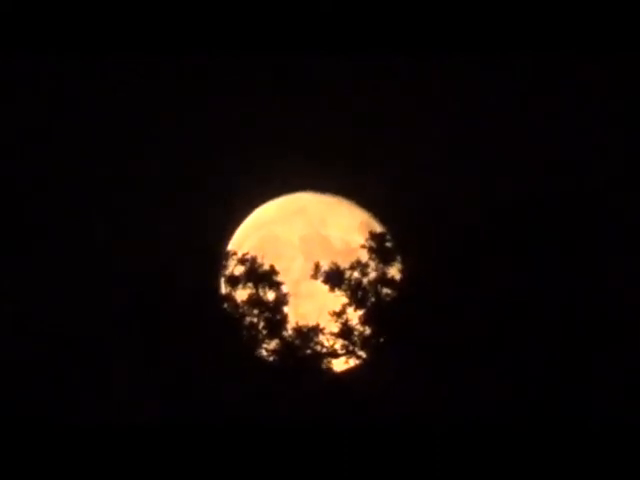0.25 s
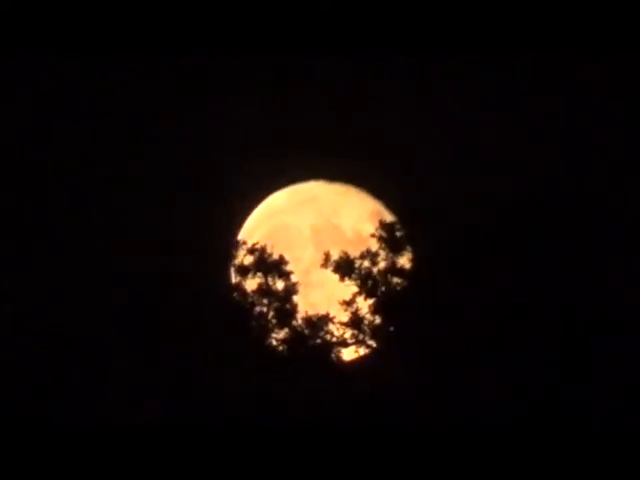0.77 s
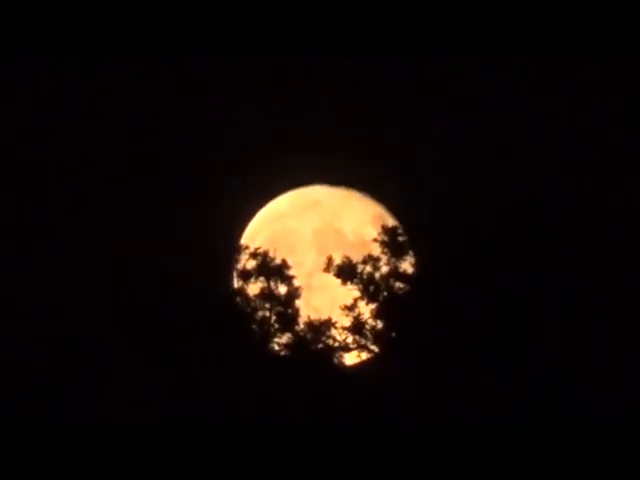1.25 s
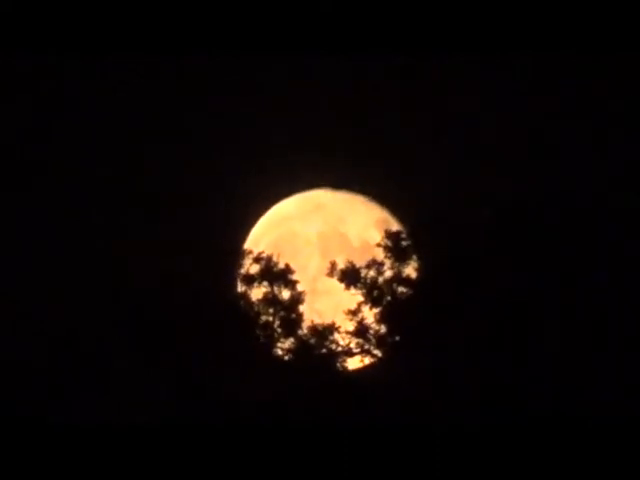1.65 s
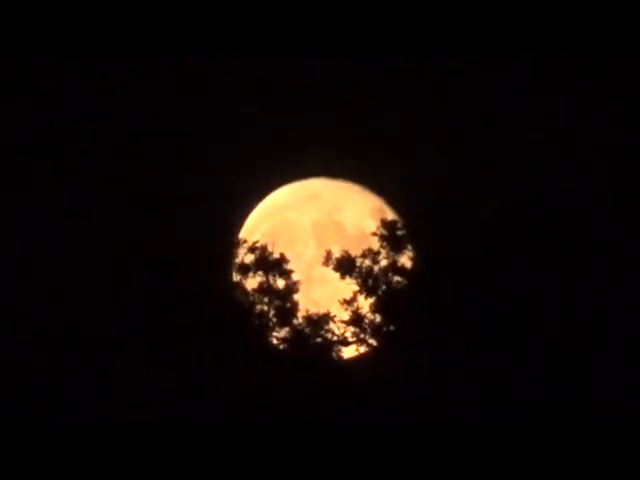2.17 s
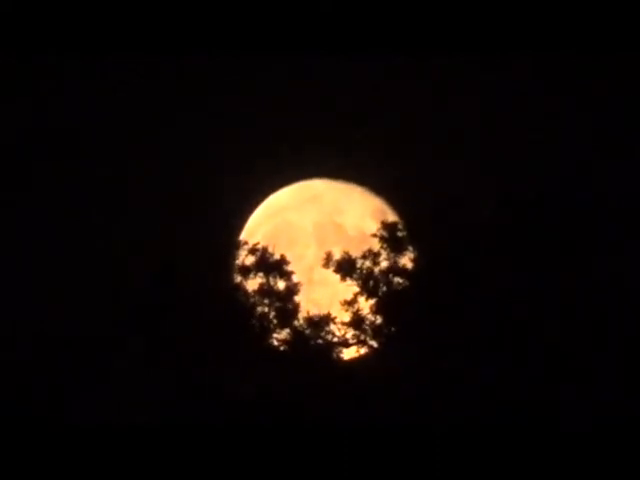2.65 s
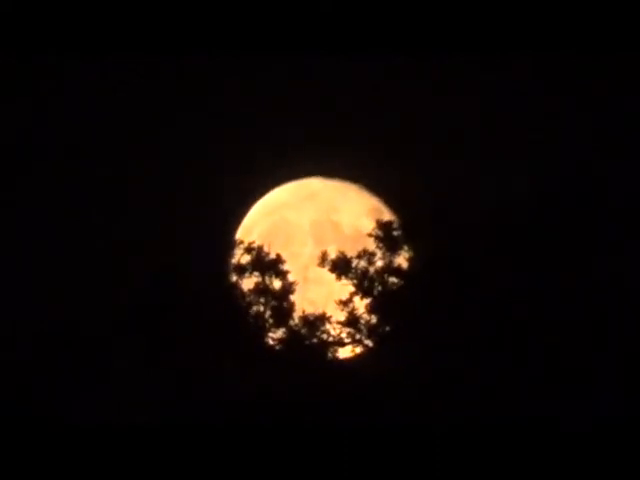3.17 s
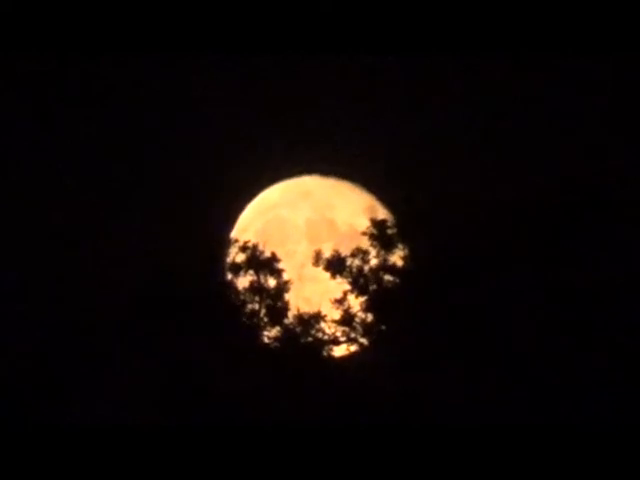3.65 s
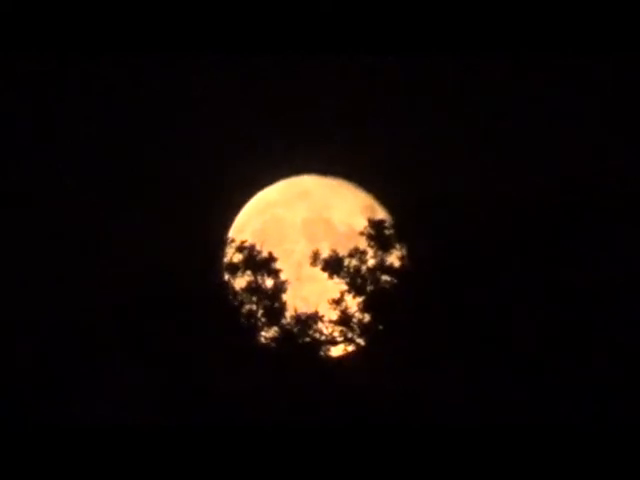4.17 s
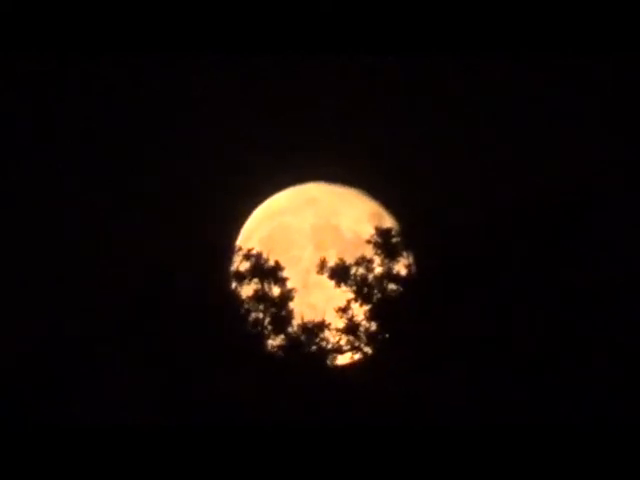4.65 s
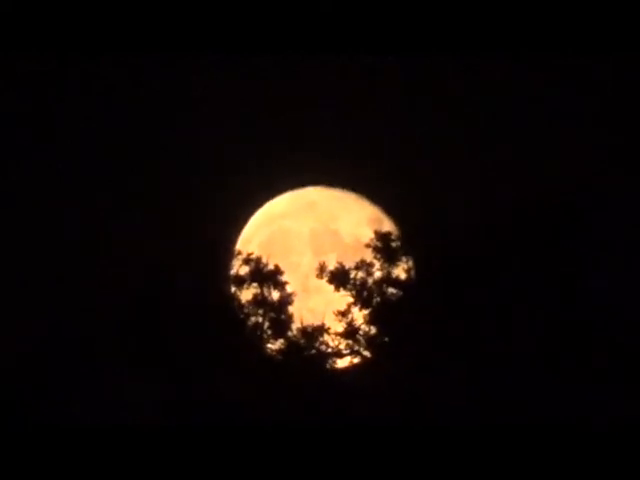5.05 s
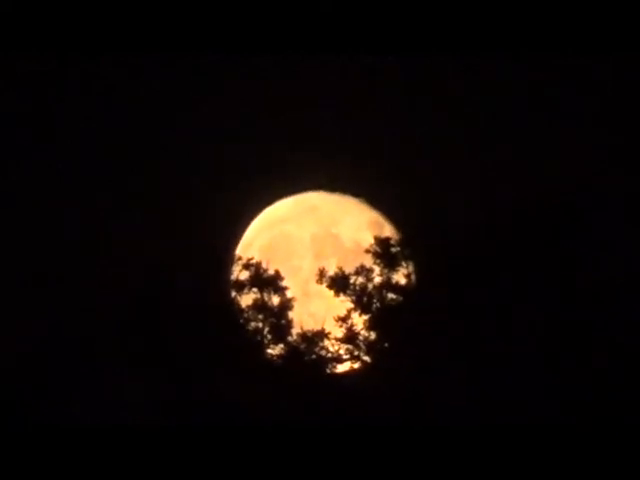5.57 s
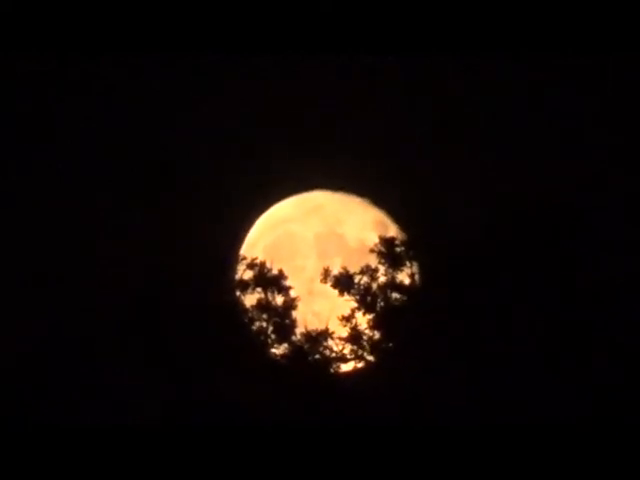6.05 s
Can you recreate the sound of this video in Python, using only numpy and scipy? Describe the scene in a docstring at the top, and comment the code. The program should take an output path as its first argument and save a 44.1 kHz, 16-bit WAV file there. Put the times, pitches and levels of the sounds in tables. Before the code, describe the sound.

Continuous high, purring cricket song fills the night, several singers blurred by echoes from foliage. One closer cricket repeatedly bursts in, fades slightly while rising in pitch, then stops, leaving the distant groups. Above is a thin, glittering insect hiss in rapid pulses; below, barely audible wide air. Two extremely dim distant hoots appear near the beginning and later on, and a crisp little tick sounds near the listener around halfway.

```python
"""Trees at night: tree crickets trill, one near singer in phrases and farther groups behind it.
Each cricket is a row of short tones, one per wing stroke, blurred by scattered echoes from foliage.
A katydid pulses as high hissing noise above them, and soft shaped noise makes the night air murmur.
Two dim, far hoots are short wavering tones. One small tick with a faint rebound, near the listener,
is a burst of noise plus a brief ring."""
import sys
import numpy as np
from scipy import signal
from scipy.fft import rfft, irfft, next_fast_len
from scipy.io import wavfile
from scipy.ndimage import uniform_filter1d

SR = 44100
rng = np.random.default_rng(int(sys.argv[2]) if len(sys.argv) > 2 else 0)


def transcribe(u):
    """Save the signal u as a 16-bit wav file named by the first command-line argument.

    u: samples, shape (n,) or (channels, n), limited to [-1, 1]; the rate is SR.
    q: integer samples, one column per channel.
    """
    v = np.clip(np.atleast_2d(u).T, -1, 1)
    q = np.round(v * 32767).astype(np.int16)
    wavfile.write(sys.argv[1], SR, q)


N = 278271  # length in samples

# singers of each farther group; levels are relative, a positive pan is louder on the left:
# pitch_hz, strokes_per_s, level_db, pan_db
LOW_CRICKETS = [(3312, 51.8, -5.5, 0), (3344, 52.4, -3, 1), (3163, 50.3, -8, -2)]
MIDDLE_CRICKETS = [(3458, 56, -0.82, .5), (3523, 57.8, -0.92, 1.2)]
HIGH_CRICKETS = [(3602, 59.5, 1.5, 1.3), (3624, 61.5, -6, 6.2), (3705, 88, -8.5, 8.2)]
# overlapping swells of the low group: crest_s, rise_db
LOW_SWELLS = [(.42, 5), (.88, 4.5), (1.45, 4.5), (1.8, 5), (2.27, 2.5), (2.73, 4.5), (3.13, 3), (4.03, 8.5),
              (5.1, 5.5), (6.22, 6)]
SWELL_WIDTH_S = 0.18
# moments when the high group falls back: middle_s, width_s, depth_db
HIGH_LULLS = [(0.702, 0.06, 5), (2.082, 0.16, 3.5), (2.499, 0.096, 3), (3.58, 0.19, 7),
              (4.524, 0.063, 13.5), (5.55, 0.22, 2)]
# levels of the groups before swells and lulls
LOW_DB, MIDDLE_DB, HIGH_DB = -45.5, -40.5, -39
# the katydid's two wing strokes: place_in_cycle (0 to 1), width_cycles, level_db (relative)
WING_STROKES = [(.04, 0.18, 0.5), (.68, 0.073, -6)]
KATYDID_CYCLES_PER_S = 15.755
# spectrum of the katydid's hiss: frequency_hz, level_db (relative)
KATYDID_SPECTRUM = [(5000, -58), (7600, -12.5), (8600, -7), (9500, -0.5), (10200, 1.5), (10700, 1.5),
                    (11200, -16), (13000, -30)]
# spectrum of the night air: frequency_hz, level_db (relative)
AIR_SPECTRUM = [(20, -28), (60, -19.5), (110, -7.5), (250, -3), (600, 1.5), (1000, 0.5), (1600, -2.5),
                (2600, -2.5), (4400, -3.5), (6000, -5.5), (11000, -16.5)]
# how alike the air is at left and right: frequency_hz, likeness (1 = the same)
AIR_LIKENESS = [(100, 0.93), (300, 0.65), (700, 0.26), (1400, 0.11), (2300, 0.13), (4500, 0.69),
                (10000, 0.11)]
# far hoots: middle_s, pitch_hz, level_db, width_s
FAR_HOOTS = [(.135, 715, -60.5, .022), (5.285, 786, -60.5, .034)]
# the nearest cricket's phrases, with levels before the fade: start_s, stop_s, level_db
NEAR_PHRASES = [(0.392, 0.516, -37.5), (.645, 0.984, -35), (1.218, 1.503, -42), (1.551, 2.035, -37),
                (2.123, 2.34, -38.5), (2.604, 3.326, -36), (3.734, 4.183, -33.5), (4.811, 5.359, -36),
                (5.724, 5.915, -37.5), (5.926, 6.407, -36.5)]
ATTACK_S, RELEASE_S = 0.0035, 0.036
# a phrase starts at this pitch and octave level, then grows higher, brighter and softer
NEAR_HZ, NEAR_OCTAVE_DB = 3480, -28
RISE_HZ_PER_S, BRIGHTEN_DB_PER_S, FADE_DB_PER_S = 80, 12, 8
# the tick and its rebound: start_s, level_db, ring_db (added to level_db for the ring)
CONTACTS = [(3.2196, -25, 1), (3.2862, -33, -18)]
# tones that ring after a tick: pitch_hz, level_db (relative), t60_s (time to fall 60 dB)
RING_MODES = [(686, -15.5, 0.036), (970, -14, 0.028), (1330, -9.5, 0.012), (1550, -12, 0.011),
              (2164, -25, 0.053), (2510, -20.5, 0.042), (4220, -19.5, 0.029), (5720, -7.5, 0.0098),
              (7440, -16, .01), (9260, -7, 0.0086)]
TOP_HZ = 11150  # nothing is heard from here up


def amp(db):
    """Turn decibels into a gain."""
    return 10 ** (np.asarray(db) / 20)


def unit(x):
    """Scale a sound to an average (rms) level of 1."""
    return x / np.sqrt(np.mean(x ** 2) + 1e-20)


def along(points, hz):
    """Read a curve of (frequency, value) points on a log frequency axis."""
    f, value = np.transpose(points)
    return np.interp(np.log(hz + 1), np.log(f + 1), value)


def wobble(rate):
    """Make a smooth random curve with about `rate` random points a second."""
    knots = rng.standard_normal(int(N * rate / SR) + 4)
    fine = signal.resample_poly(knots, 10, 1)
    return np.interp(np.arange(N) * 10 * rate / SR, np.arange(len(fine)), fine)


def bump(at, width):
    """A smooth rise and fall of height 1 around a moment, both in seconds."""
    return np.exp(-.5 * ((np.arange(N) / SR - at) / width) ** 2)


def filtered(x, response):
    """Multiply the spectrum of a sound by a response to frequency."""
    m = next_fast_len(N + SR // 2)
    spectrum = rfft(x, m) * response(np.fft.rfftfreq(m, 1 / SR))
    return irfft(spectrum, m)[..., :N]


def panned(pan_db):
    """Left and right gains that differ by pan_db."""
    return amp([[pan_db / 2], [-pan_db / 2]])


def rush(colour, alike, patchy_db):
    """Stereo noise with a given spectrum and left-right likeness, in brief patches of random gain."""
    grid = signal.stft(rng.standard_normal((2, N)), nperseg=1024)[2]
    patches = rng.standard_normal(grid.shape[1:])
    patches = uniform_filter1d(patches, size=3, axis=0)  # smooth over frequency
    patches = uniform_filter1d(patches, size=4, axis=1)  # smooth over time
    pair = signal.istft(grid * amp(patchy_db * unit(patches)))[1][:, :N]

    def response(hz):
        # more shared (mid) sound makes the ears more alike
        angle = np.arccos(np.clip(along(alike, hz), -1, 1)) / 2
        return amp(along(colour, hz)) * [np.cos(angle), np.sin(angle)]

    mid, side = filtered(pair, response)
    return unit(np.array([mid + side, mid - side]))


def foliage(x, wet_db, t60, side_db):
    """Direct sound plus a dense scatter from leaves and trunks, a little different at each ear."""
    t = np.arange(SR // 3) / SR
    mid, side = rng.standard_normal((2, len(t))) * amp(-60 * t / t60)
    paths = np.array([mid + amp(side_db) * side, mid - amp(side_db) * side])
    paths *= amp(wet_db) / np.linalg.norm(paths[0])
    paths[:, 0] += 1  # the direct sound
    # mirrored sound ahead of the start lets the scatter be there already
    lead_in = np.pad(x, (len(t) - 1, 0), mode="reflect")
    return signal.fftconvolve(lead_in[None], paths, "valid", axes=1)


def trill(pitch_hz, strokes, glide, duty, overtone_db, rasp_db):
    """One cricket: each closing of the wings sounds a short tone that sags as the scraper slows."""
    stroke_rate = strokes * (1 + .012 * wobble(4) + .024 * wobble(35))
    cycle = rng.random() + np.cumsum(stroke_rate) / SR
    # 0 to 1 during the closing, then held at 1 (silent) until the next; duty is the sounding share
    stroke = np.minimum(cycle % 1 / np.clip(duty, .2, 1), 1)
    pitch = pitch_hz * (1 + glide * (.5 - stroke) + .008 * wobble(70))
    phase = 2 * np.pi * np.cumsum(pitch) / SR
    # uneven teeth on the file add a faint rasp around the tone and roughen its octave
    tone = np.sin(phase) * (1 + amp(rasp_db) * wobble(3200))
    octave = amp(overtone_db) * np.sin(2 * phase + 1.24 * wobble(600))
    loudness = np.sin(np.pi * stroke) ** 2 * amp(1.47 * wobble(40))
    return unit((tone + octave) * loudness)


def group(singers, level_db, glide, duty, overtone_db, rasp_db, wet_db):
    """Several crickets scattered in the trees; louder song is also brighter and raspier."""
    bright_db = 0.25 * (level_db - level_db.mean())
    voices = 0
    for pitch_hz, strokes, db, pan_db in singers:
        song = trill(pitch_hz, strokes, glide, duty, overtone_db + bright_db, rasp_db + bright_db)
        heard = unit(foliage(song, wet_db, t60=0.24, side_db=-8))
        voices = voices + amp(db) * panned(pan_db) * heard
    return amp(level_db) * unit(voices)


def crickets():
    """Low singers swell and high ones fall back in lulls; the middle group follows both neighbours."""
    swell_db = sum(db * bump(s, SWELL_WIDTH_S) for s, db in LOW_SWELLS)
    lull_db = sum(db * bump(s, width) for s, width, db in HIGH_LULLS)
    low_db = LOW_DB + swell_db - 0.051 * lull_db
    middle_db = MIDDLE_DB + 0.41 * swell_db - 0.36 * lull_db
    high_db = HIGH_DB - lull_db
    low = group(LOW_CRICKETS, low_db, glide=.1, duty=.6,
                overtone_db=-28.5, rasp_db=-29.0, wet_db=0.0)
    middle = group(MIDDLE_CRICKETS, middle_db, glide=.05, duty=.68,
                   overtone_db=-24.5, rasp_db=-31.5, wet_db=-1.5)
    high = group(HIGH_CRICKETS, high_db, glide=.06, duty=.64,
                 overtone_db=-26.5, rasp_db=-28.0, wet_db=-0.5)
    return low + middle + high


def katydid():
    """A long and a short wing stroke per cycle, over the glittering hiss of farther neighbours."""
    cycle = KATYDID_CYCLES_PER_S * np.arange(N) / SR
    beats = 0
    for at, width, db in WING_STROKES:
        distance = (cycle - at + .5) % 1 - .5  # from the stroke's middle, in cycles
        beats = beats + amp(db) * np.exp(-.5 * (distance / width) ** 2)
    pulses = unit(beats * amp(1.9 * wobble(24)))
    near = pulses * rush(KATYDID_SPECTRUM, [(10000, 0.91)], patchy_db=0.0)
    far = rush(KATYDID_SPECTRUM, [(10000, 0.85)], patchy_db=3.5)
    return (amp(-57.5) * near + amp(-53.0) * far) * panned(-0.81)


def air():
    """The wide murmur of the night: shaped noise whose level drifts only slightly."""
    return amp(-56.5 + 0.21 * wobble(3.3)) * rush(AIR_SPECTRUM, AIR_LIKENESS, patchy_db=0.93)


def hoots():
    """Short, soft far-off tones, blurred by distance through a wavering phase."""
    t = np.arange(N) / SR
    total = 0
    for s, hz, db, width in FAR_HOOTS:
        tone = np.sin(2 * np.pi * hz * t + 0.89 * wobble(90))
        total = total + amp(db) * bump(s, width) * tone
    return total


def near_cricket():
    """Phrases start sharply, creep up in pitch and brightness as they fade, and let go softly."""
    t = np.arange(N) / SR
    start = np.array([row[0] for row in NEAR_PHRASES])
    latest = np.maximum(np.searchsorted(start, t) - 1, 0)
    age = np.abs(t - start[latest])  # seconds since the phrase began
    gate = 0
    for on, off, db in NEAR_PHRASES:
        attack = np.clip((t - on) / ATTACK_S, 0, 1)
        release = np.clip((off - t) / RELEASE_S, 0, 1)
        gate = gate + amp(db) * attack * release
    effort = gate * amp(-FADE_DB_PER_S * age)
    song = trill(NEAR_HZ + RISE_HZ_PER_S * age, strokes=56.8, glide=.04, duty=.72,
                 overtone_db=NEAR_OCTAVE_DB + BRIGHTEN_DB_PER_S * age, rasp_db=-30.5)
    direct = effort * song
    heard = foliage(direct, wet_db=0.0, t60=0.36, side_db=-11.5)
    return unit(heard) * np.std(direct) * panned(0.2)


def without_bass(x, edge_hz):
    """Weaken what lies below edge_hz: so small a thing radiates no bass."""
    high_pass = signal.butter(2, edge_hz, "high", fs=SR, output="sos")
    return signal.sosfilt(high_pass, x[:, :N])


def ticks():
    """A small hard contact: a thin, bright crack of noise and a brief ring of fading tones."""
    cracks, rings = np.zeros((2, 2, N + SR))
    t = np.arange(SR // 8) / SR
    for s, db, ring_db in CONTACTS:
        ring = 0
        for hz, level, t60 in RING_MODES:
            # a slightly different random phase at each ear
            turns = hz * t + 0.29 * rng.random((2, 1))
            ring = ring + amp(level - 60 * t / t60) * np.sin(2 * np.pi * turns)
        onset = 1 - np.exp(-t / 0.00071)
        crack = amp(db - 7.5 - 60 * t / 0.014) * rng.standard_normal(len(t))
        first = round(s * SR)
        rings[:, first:first + len(t)] += amp(db + ring_db) * ring * onset
        cracks[:, first:first + len(t)] += crack
    return without_bass(cracks, edge_hz=4500) + without_bass(rings, edge_hz=270)


def scene():
    """Insects, small sounds and air together."""
    return crickets() + katydid() + air() + hoots() + near_cricket() + ticks()


def record(dry):
    """Keep only the frequencies below TOP_HZ."""
    return filtered(dry, lambda hz: hz < TOP_HZ)


dry = scene()
out = record(dry)
transcribe(out)
```